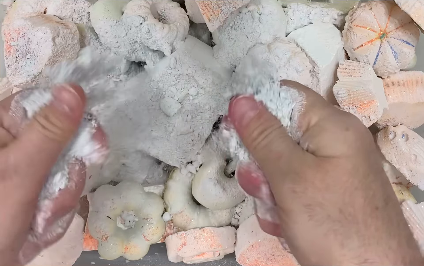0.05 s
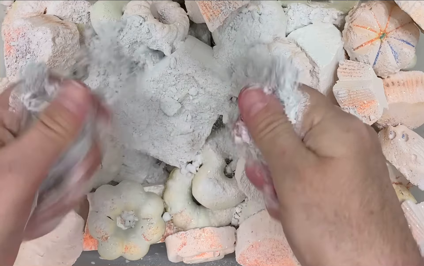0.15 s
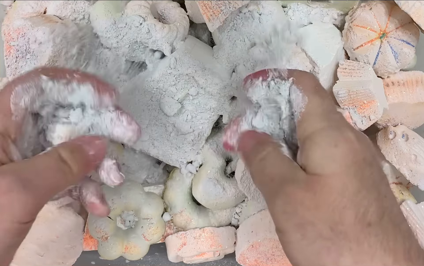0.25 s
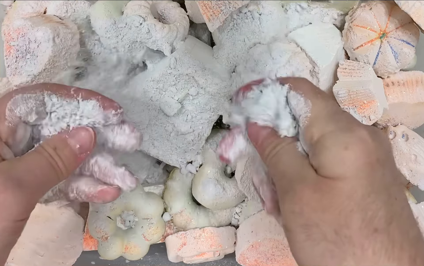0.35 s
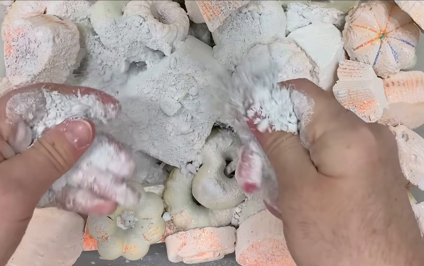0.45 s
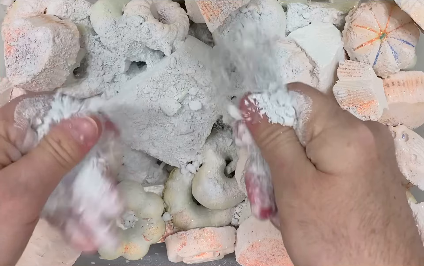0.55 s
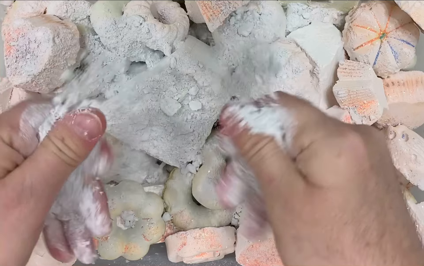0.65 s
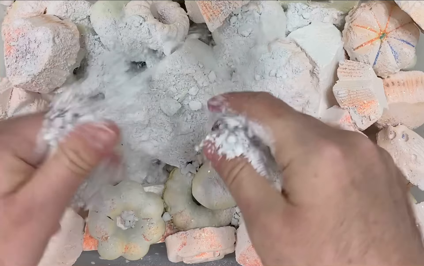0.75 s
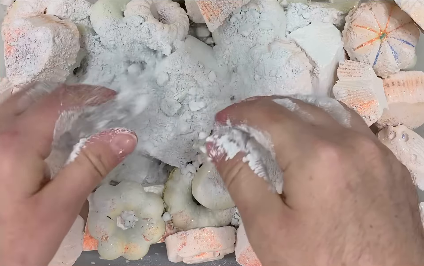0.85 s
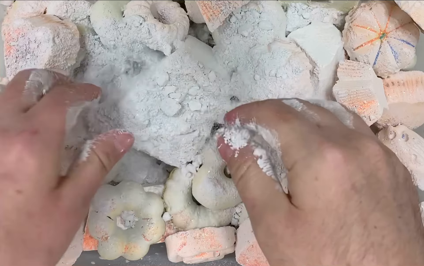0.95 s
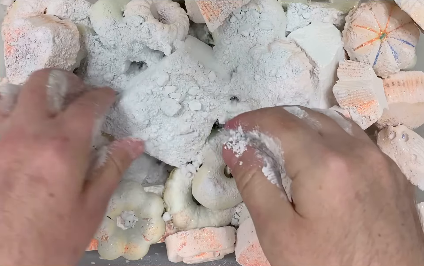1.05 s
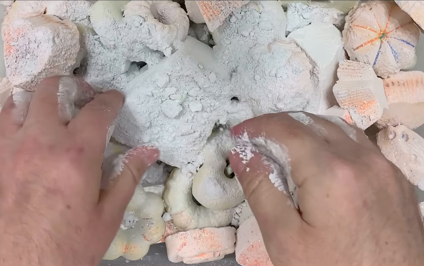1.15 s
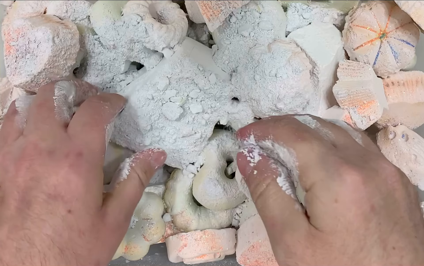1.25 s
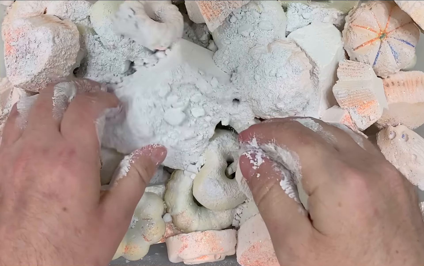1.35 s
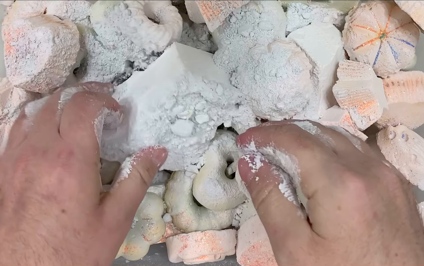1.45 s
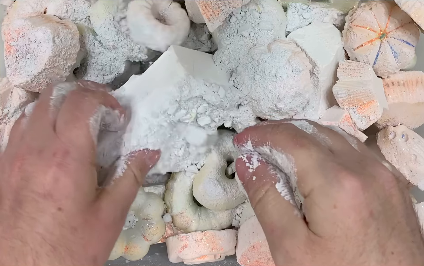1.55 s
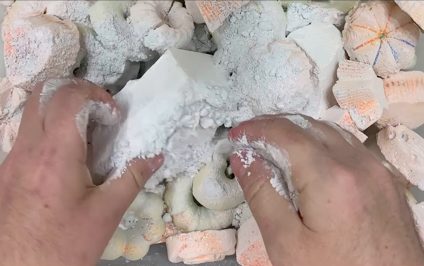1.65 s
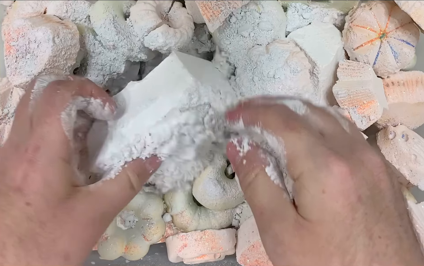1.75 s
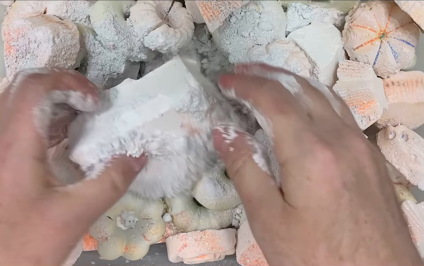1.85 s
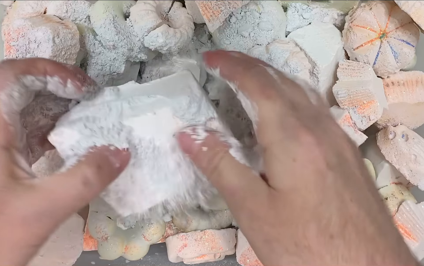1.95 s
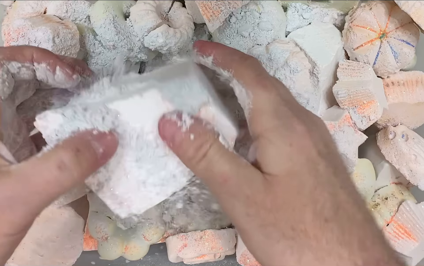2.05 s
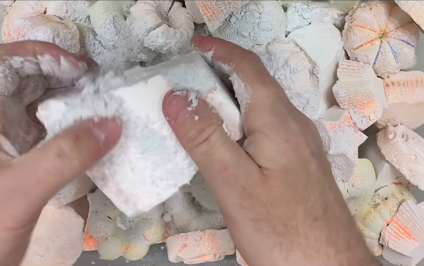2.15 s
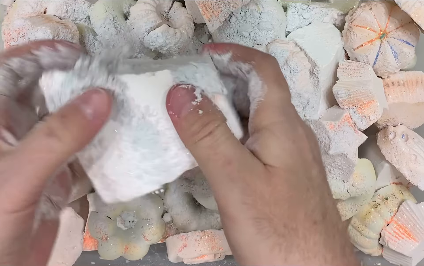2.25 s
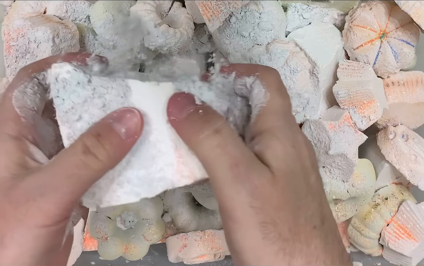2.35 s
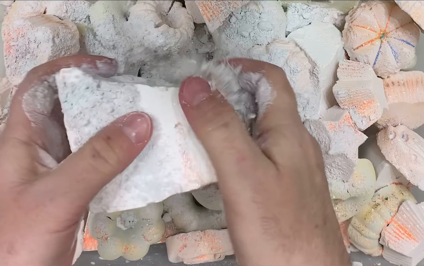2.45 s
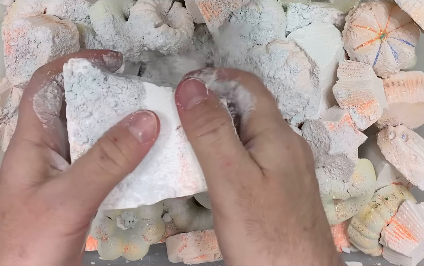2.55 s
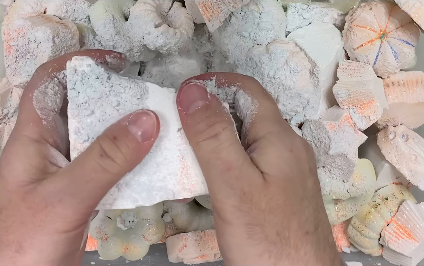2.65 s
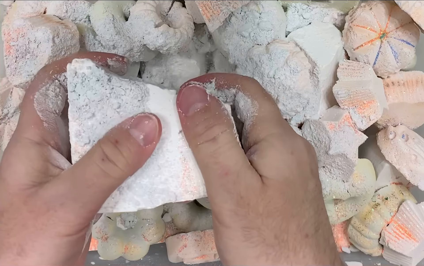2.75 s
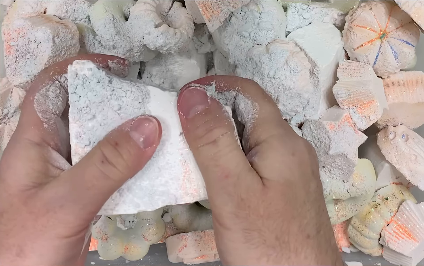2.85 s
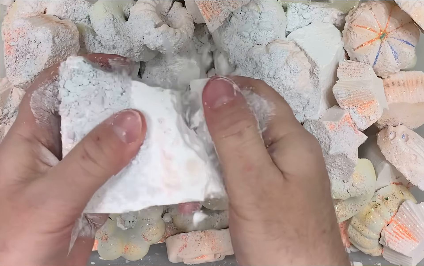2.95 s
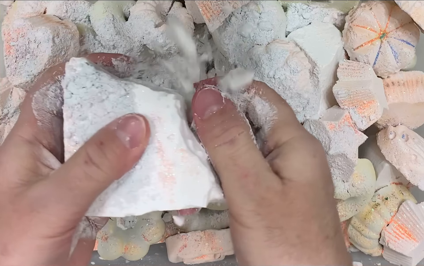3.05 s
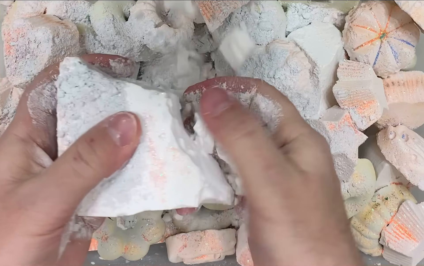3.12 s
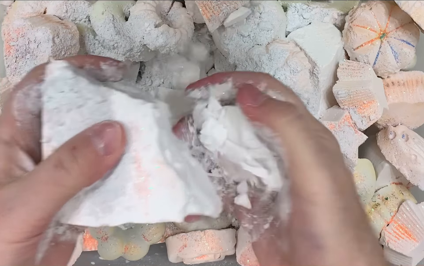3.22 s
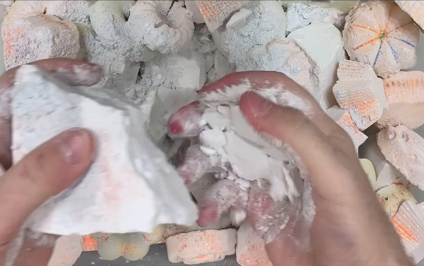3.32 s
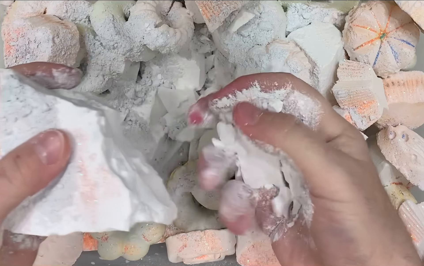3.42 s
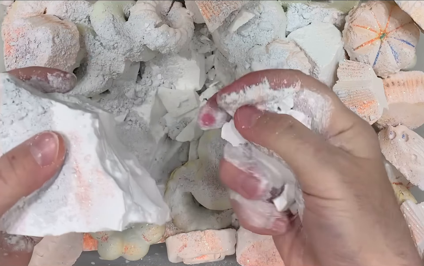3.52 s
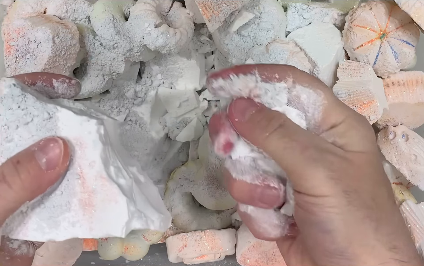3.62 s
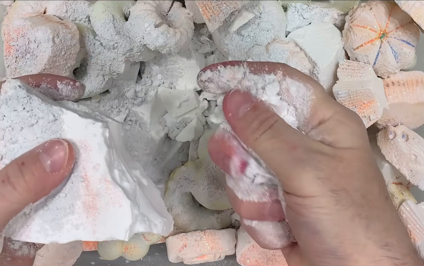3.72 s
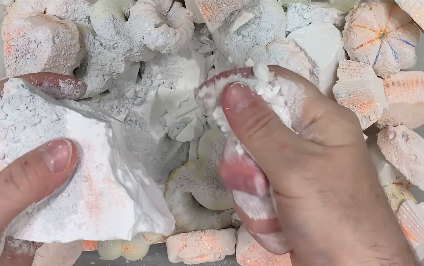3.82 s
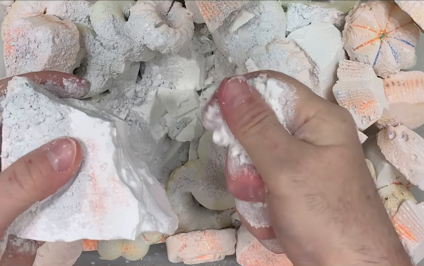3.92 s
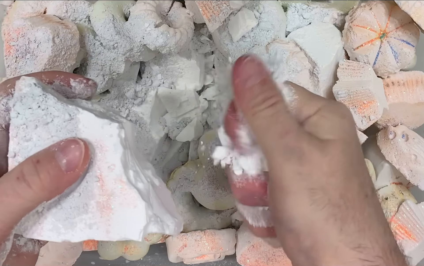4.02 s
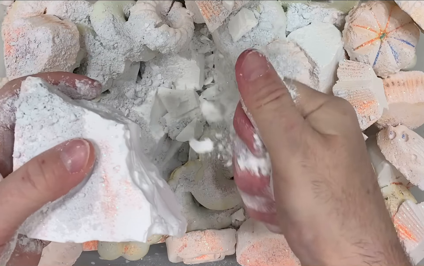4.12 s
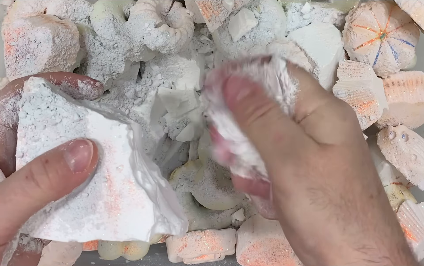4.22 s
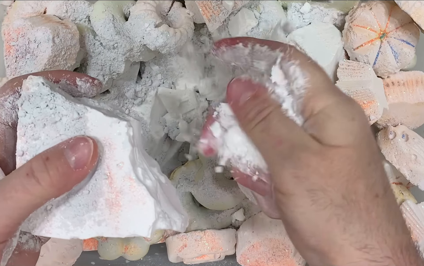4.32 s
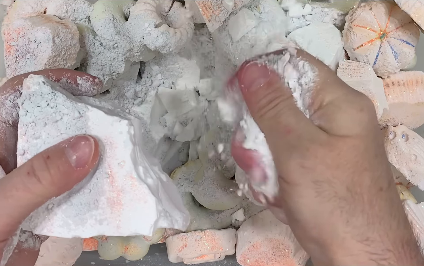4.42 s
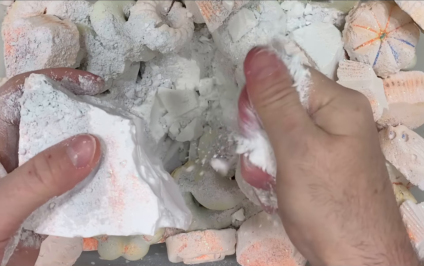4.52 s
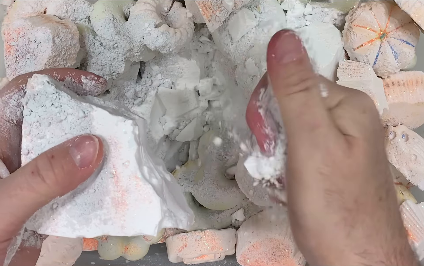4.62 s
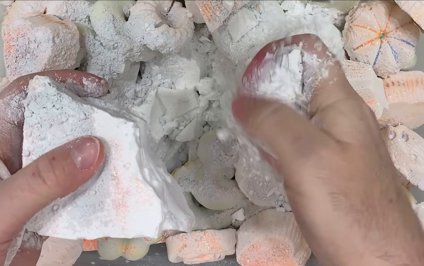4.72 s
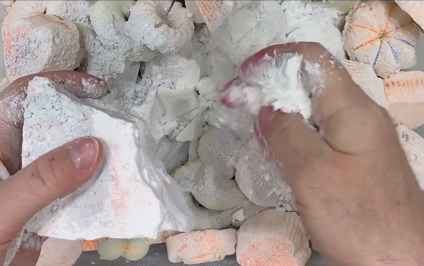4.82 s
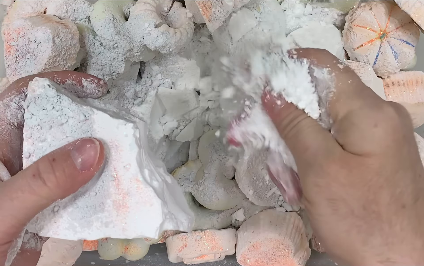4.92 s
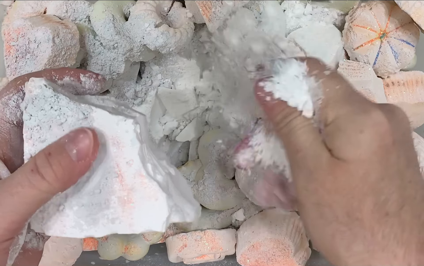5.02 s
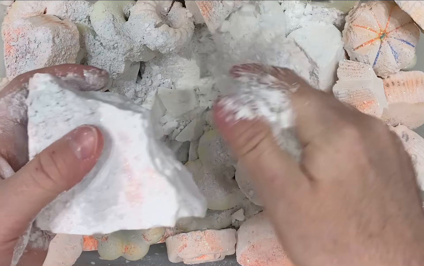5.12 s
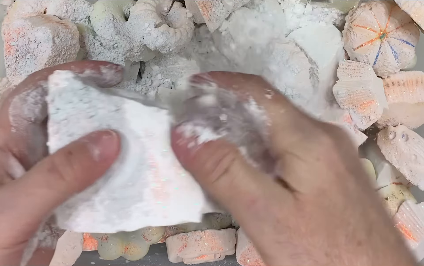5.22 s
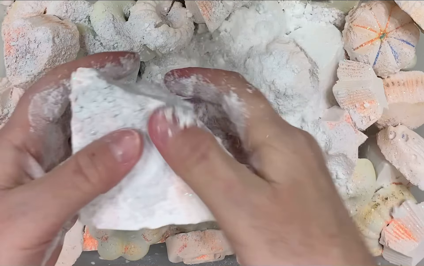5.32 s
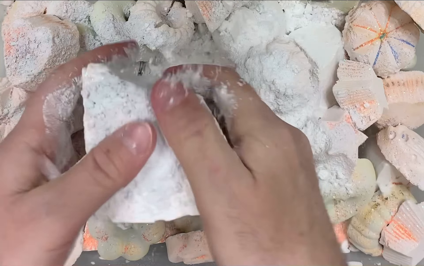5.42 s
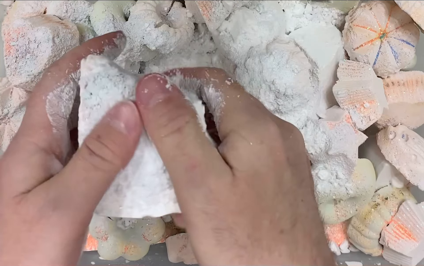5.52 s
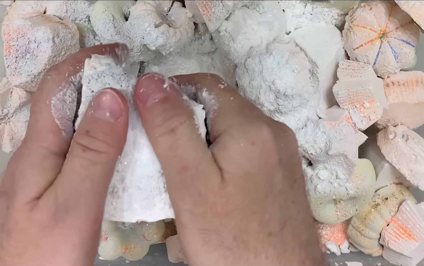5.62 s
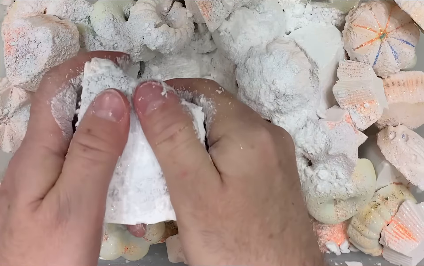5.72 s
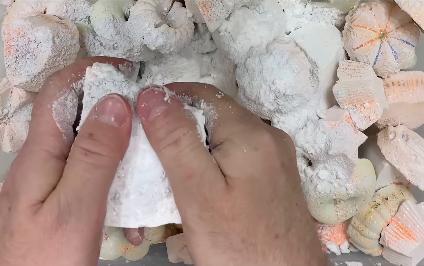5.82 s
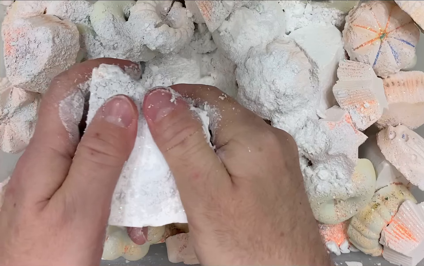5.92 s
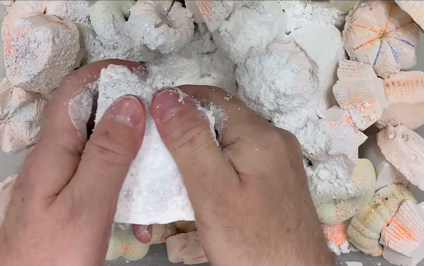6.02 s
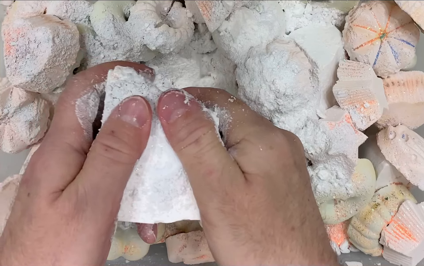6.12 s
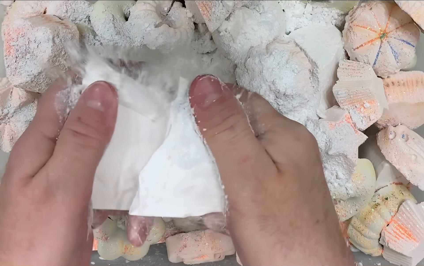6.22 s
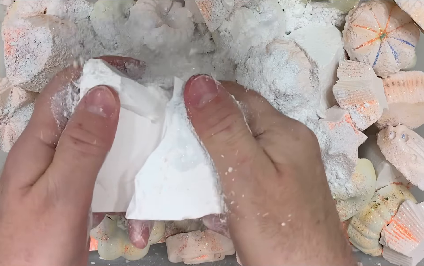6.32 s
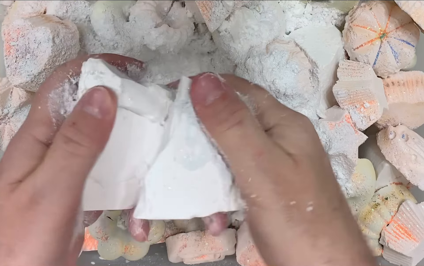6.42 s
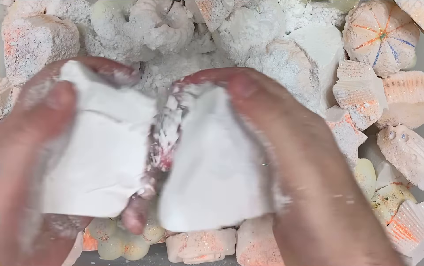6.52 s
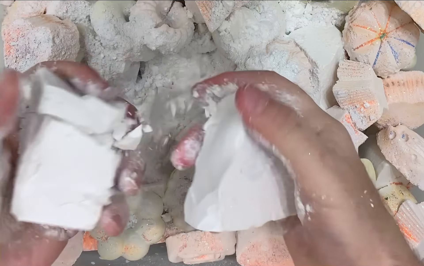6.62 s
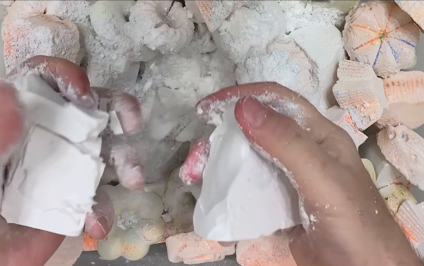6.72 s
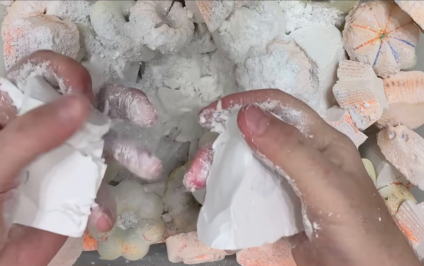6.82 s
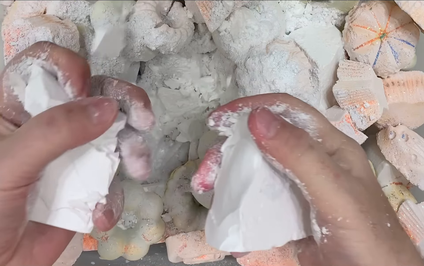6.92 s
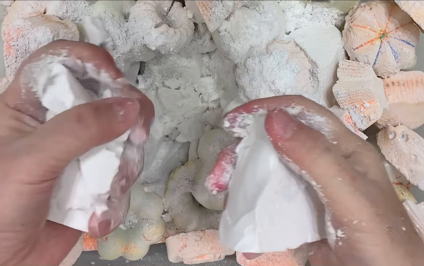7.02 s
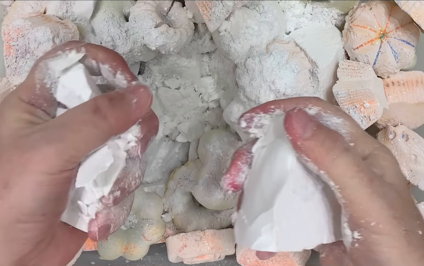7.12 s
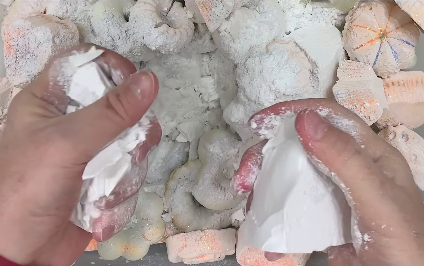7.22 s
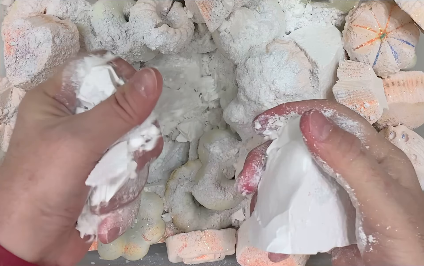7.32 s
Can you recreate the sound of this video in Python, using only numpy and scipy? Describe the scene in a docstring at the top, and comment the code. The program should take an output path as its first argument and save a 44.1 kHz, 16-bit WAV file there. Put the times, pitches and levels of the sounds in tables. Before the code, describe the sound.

Dry chalk blocks squeezed, snapped and crumbled by hand up close, gritty crunching with sharp cracks, falling crumbs and dull knocks in a quiet room.

```python
"""Chalk crumbled by hand, close up

A quiet room, with a small microphone close to two hands that squeeze, snap and crumble dry chalk. Swarms of
tiny ringing fractures make the grit; single cracks ring their pieces and spit noisy splinters. Lumps knock and
roll on the heap, and one big block tears apart in a run of tears that rings its modes. A low rumble of resonant
noise and a faint hiss lie beneath; the loudest breaks overload the input."""
import sys
import numpy as np
from scipy import signal
from scipy.fft import rfft, irfft, next_fast_len
from scipy.io import wavfile

SR = 44100
rng = np.random.default_rng(int(sys.argv[2]) if len(sys.argv) > 2 else 0)


def bounce(signal):
    """Save signal as a 16-bit WAV file at the path given by the first command-line argument."""
    frames = np.transpose(np.atleast_2d(signal))
    limited = np.clip(frames, -1, 1)
    pcm = np.round(limited * 32767).astype(np.int16)
    wavfile.write(sys.argv[1], SR, pcm)


def invert_db(level):
    """Linear amplitude ratio for a level in decibels (20 dB per decade), elementwise."""
    return 10 ** (np.asarray(level, dtype=float) / 20)


N = 325017

# room rumble, noise in the low resonances, before drift and thrum: (frequency [Hz], width [Hz], rms level [dB])
RUMBLE = [(62.3, 5.4, -37), (77.2, 7.6, -41), (125.3, 3.7, -41)]
# slow drift of the rumble: (time [s], level [dB])
RUMBLE_DRIFT = [(0, -4), (.8, 0.5), (1.65, 7), (1.9, -0.5), (7.37, -1.5)]
# colour of the faint hiss: (frequency [Hz], relative level [dB])
HISS_COLOUR = [(300, -2.5), (1500, -7.5), (15000, -7.5)]
# colour of the sound from the sides and of the echoes: (frequency [Hz], relative level [dB])
SIDE_COLOUR = [(100, -27), (300, 6.5), (2000, 7.5), (5000, -20), (15000, -60)]
# dull knocks of a block on the heap: (time [s], nominal level [dB], pitch [Hz])
KNOCKS = [(1.438, -6.5, 282), (1.465, -9, 126), (1.594, -11, 274), (1.63, -8.5, 298), (1.67, -11, 66.6),
          (2.93, -8, 237), (3.174, -1, 299), (3.19, -1.5, 331), (3.506, -9.5, 303), (4.244, -7.5, 488),
          (6.18, 0, 124), (6.983, -3, 263), (7.064, -6, 265)]
# modes of the big block: (frequency [Hz], relative level [dB], t60 [s])
BLOCK_MODES = [(253, -5, 0.047), (700, -9, .015), (1257, 3, 0.014), (2340, -0.5, 0.0078)]
# single cracks: (time [s], nominal level [dB], pitch of the piece [Hz], relative splinter level [dB])
CRACKS = [(0.031, -5.5, 2600, -12), (0.276, -15, 6700, 6.5), (0.379, -2, 1450, -10), (0.398, -0.5, 1490, 2),
          (0.408, 7.5, 3770, -19), (0.434, -1, 1400, -12), (0.452, -2, 1340, -20), (0.474, -9, 1510, -22),
          (0.522, -6, 1720, -12), (0.551, 0, 6000, -0.5), (0.567, -1, 6160, -19), (0.628, -10.5, 1490, -18),
          (0.826, -5, 4050, -25), (0.871, -4.5, 2900, -22), (0.932, 5, 3320, -5.5), (1.299, -4.5, 775, -34),
          (1.535, -21, 800, -10), (1.807, -14.5, 6140, -17), (1.967, -7.5, 940, -8),
          (2.008, -13, 1810, -23), (2.087, -10, 1840, -23), (2.111, -8.5, 930, -18),
          (2.173, -9.5, 760, -25), (2.292, -14, 6660, -8), (2.386, -16, 2870, -4), (2.517, -10, 1610, -23),
          (2.891, -13, 1500, -6), (3.041, 2, 2600, -27), (3.13, -5.5, 1290, -7.5), (3.172, -1, 480, -1.5),
          (3.217, -7, 1300, -5), (3.253, 2, 6160, -2), (3.354, -12, 826, -17), (3.401, -4.5, 1320, -20),
          (3.444, 0, 6300, -3), (3.472, -3.5, 1530, 6.5), (3.494, -2, 2150, 8), (3.632, 7, 2100, -7),
          (3.73, 6, 1470, 0), (3.802, -2, 1510, -10), (3.855, 4.5, 1390, 2), (3.913, -1, 6440, -6),
          (3.966, -4, 6070, 6.5), (4.0, -1.5, 1820, 1), (4.092, -3, 6500, -2.5), (4.237, -2, 916, -12),
          (4.286, -9.5, 1350, -14), (4.347, -8, 1830, -5), (4.379, -6.5, 1780, -14), (4.411, -9, 3270, -11),
          (5.079, -4, 1530, -3), (5.157, -10.5, 1490, -12), (5.2, -5.5, 1410, -2), (5.227, -12, 1400, -27),
          (5.287, -3, 848, -30), (5.338, -10.5, 674, -14), (5.352, -7.5, 525, -22), (5.455, -6.5, 920, -14),
          (5.492, -8, 3820, -14), (5.727, -10, 1410, -17), (6.294, -15, 1740, -6), (6.308, -8, 2400, 5),
          (6.382, -5, 1090, -12), (6.455, -14, 1680, -10), (6.597, -7, 6600, 0), (6.654, -10, 3700, -8),
          (6.692, -12, 6260, -4), (6.721, -3, 6060, 5), (6.815, -7, 780, 2), (6.87, 2.5, 5920, 1.5),
          (6.942, 10, 2720, -6), (6.988, 3, 1800, 5), (7.022, 1, 3040, -2), (7.066, 3, 904, -5),
          (7.125, 3, 3260, -20), (7.242, 9.5, 493, -8), (7.303, -3, 1700, -4), (7.344, 14.5, 6430, -17)]
# squeezes, rubs and breaks that shed grit:
# (start [s], length [s], coarse grit level [dB], powder level [dB], lump level [dB])
SQUEEZES = [(-0.02, .17, -18, -25, -26.5), (0.265, 0.12, -48, -24, -30), (0.335, 0.28, -20.5, -27.5, -29),
            (0.539, 0.079, -22.5, -19, -43), (0.659, 0.12, -30, -24, -39), (0.81, 0.21, -32, -25.5, -25.5),
            (0.904, 0.16, -30, -37, -25.5), (1.11, 0.18, -35.5, -41, -30.5), (1.27, 0.17, -39, -70, -23.5),
            (1.437, 0.22, -68, -61, -27), (1.55, 0.12, -54, -35, -21), (1.852, 0.24, -36, -39.5, -34.5),
            (1.941, 0.18, -29.5, -44, -26), (2.051, 0.15, -30.5, -31.5, -23),
            (2.272, 0.18, -31.5, -22, -35.5), (2.495, 0.18, -35.5, -37.5, -39.5),
            (2.893, 0.15, -11.5, -8, -24.5), (3.162, 0.19, -25, -25, -16.5),
            (3.389, 0.083, -24, -47, -20.5), (3.419, 0.098, -27, -21, -29), (3.48, 0.091, -13, -9, -16),
            (3.566, 0.25, -24, -15, -31.5), (3.709, 0.15, -13, -12, -27), (3.839, 0.098, -16, -16, -25),
            (3.902, 0.096, -26, -11.5, -28), (3.974, 0.11, -23, -15.5, -27.5),
            (4.21, 0.14, -25, -20, -25.5), (4.37, 0.24, -28.5, -26, -32.5), (4.721, 0.062, -30, -32, -34),
            (4.827, 0.16, -26.5, -27.5, -37.5), (5.053, 0.27, -26, -27.5, -27.5),
            (5.295, 0.26, -25.5, -33, -25.5), (5.442, 0.14, -29, -23.5, -29),
            (5.697, 0.081, -28, -71, -30.5), (6.157, 0.18, -11.5, -9.5, -13.5),
            (6.588, 0.21, -41, -23.5, -36.5), (6.81, 0.2, -26.5, -20.5, -26),
            (6.929, 0.22, -17, -14, -21.5), (7.014, 0.14, -11.5, -9, -23), (7.116, 0.086, -15.5, -12, -31),
            (7.171, 0.18, -17, -10.5, -22), (7.327, .1, -25.5, -13, -24)]
# crumbs falling between squeezes: (time [s], powder level [dB])
TRICKLE = [(0, -28.5), (.9, -40), (1.3, -46), (2.8, -45.5), (3.5, -35), (4.6, -36), (5.5, -36), (5.8, -69),
           (6.15, -54), (6.45, -34.5), (7.37, -35.5)]
# colour of each grain size, lumps down to powder: (frequency [Hz], relative level [dB])
LUMP_COLOUR = [(130, -74), (220, 6), (350, -8), (550, -6), (800, -3)]
COARSE_COLOUR = [(700, -8.5), (1300, 4), (2300, 7)]
FINE_COLOUR = [(2400, -18), (3300, -5), (4700, -5)]
POWDER_COLOUR = [(5000, 3.5), (6500, 0.5), (9000, -8), (12000, -1.5), (16000, -43)]


def rms_one(x):
    """Scales a signal to an rms of 1."""
    return x / np.sqrt(np.mean(x ** 2) + 1e-20)


def at_hz(points, hz):
    """Reads a (frequency [Hz], level [dB]) table along log frequency."""
    table_hz, level_db = np.transpose(points)
    return np.interp(np.log(hz + 1), np.log(table_hz), level_db)


def in_time(rows):
    """Draws each column of a (time [s], level [dB]) table as a line over the whole scene."""
    s, *columns = np.transpose(rows)
    return [np.interp(np.arange(N) / SR, s, column) for column in columns]


def coloured(x, points):
    """Shapes the spectrum along a (frequency [Hz], level [dB]) table."""
    size = next_fast_len(x.shape[-1])
    gain = invert_db(at_hz(points, np.fft.rfftfreq(size, 1 / SR)))
    return irfft(rfft(x, size) * gain, size)[..., :x.shape[-1]]


def ring(clicks, hz, t60):
    """A two-pole resonance: a unit click sets a sine of about height 1 ringing and dying."""
    r = invert_db(-60 / (t60 * SR))
    w = 2 * np.pi * hz / SR
    return signal.lfilter([0, np.sin(w)], [1, -2 * r * np.cos(w), r * r], clicks + 1e-18)


def air_hiss():
    """Faint coloured noise, one row for the centre and one for the sides."""
    return invert_db(-41) * rms_one(coloured(rng.standard_normal((2, N)), HISS_COLOUR))


def room_tone():
    """Noise in narrow low resonances makes a wavering rumble, nearly alike in both channels."""
    out = 0
    for hz, width_hz, level_db in RUMBLE:
        t60 = np.log(1000) / (np.pi * width_hz)
        noise = rng.standard_normal((2, N + SR))
        mid, side = ring(noise, hz, t60)[:, SR:]  # the first second lets the resonance build up
        out = out + invert_db(level_db) * rms_one(mid + invert_db(-13.5) * side * [[1], [-1]])
    return out


def thrum(lump_db):
    """The table thrums with the lumps: a gain on the rumble that follows their level with a lag."""
    lag_s = 0.027
    keep = np.exp(-1 / (lag_s * SR))
    return 1 + signal.lfilter([1 - keep], [1, -keep], invert_db(lump_db + 24))


def reflections(x):
    """Dense decaying echoes off heap and walls, different in each channel; they change as the hands move."""
    room_t60_s, first_echo_s = 0.064, 0.0015
    hop = 4096
    t = np.arange(hop) / SR
    window = np.sin(np.pi * np.arange(2 * hop) / (2 * hop))
    padded = np.pad(x, (hop, 2 * hop))
    out = np.zeros((2, N + 5 * hop))
    for at in range(0, N + hop, hop):
        tail = rng.standard_normal((2, hop)) * invert_db(-60 * t / room_t60_s) * (t > first_echo_s)
        tail = coloured(tail / np.sqrt(np.sum(tail ** 2, axis=1, keepdims=True)), SIDE_COLOUR)
        piece = padded[at:at + 2 * hop] * window
        out[:, at:at + 3 * hop - 1] += signal.fftconvolve(piece[None], tail, axes=1)
    return out[:, hop:hop + N]


def two_channels(centre, sides):
    """Side sound has opposite sign in the two channels; the right channel is a little late, its phase turned."""
    lag_s, lead_rad, lead_hz = 0.00025, 4.527, 2670  # the phase lead levels off above lead_hz
    size = next_fast_len(N + 64)
    hz = np.fft.rfftfreq(size, 1 / SR)
    turn = lead_rad * np.tanh(hz / lead_hz) - 2 * np.pi * hz * lag_s
    sides = coloured(sides, SIDE_COLOUR)
    left = invert_db(-0.5) * (centre + sides)
    right = irfft(rfft(centre - sides, size) * np.exp(1j * turn), size)[:N]
    return np.array([left, right])


def knocks():
    """A soft contact swells within milliseconds and rings the block and, lower, the heap."""
    out = np.zeros(N + 4096)
    t = np.arange(4096) / SR
    swell = 1 - np.exp(-t / 0.0026)
    for s, level_db, hz in KNOCKS:
        pitches = hz * np.array([[1], [0.56], [1.7]])
        decay = invert_db(-60 * t / (0.03 + 16 / pitches))
        body = invert_db([[-1], [-7], [-9]]) * np.sin(2 * np.pi * pitches * t) * decay
        at = round(s * SR)
        out[at:at + 4096] += invert_db(level_db) * body.sum(axis=0) * swell
    return out[:N]


def block_break():
    """The big block tears apart: a dying run of random tears rings its modes."""
    start_s, rise_s, t60_s, level_db, tears_per_s = 6.162, 0.016, 0.42, -5, 1500
    t = np.arange(N) / SR - start_s
    shape = (len(BLOCK_MODES), N)
    tears = (rng.random(shape) < tears_per_s / SR) * rng.standard_normal(shape)
    rings = 0
    for row, (hz, mode_db, mode_t60) in zip(tears, BLOCK_MODES):
        rings = rings + invert_db(mode_db) * rms_one(ring(row, hz, mode_t60))
    decay = invert_db(level_db - 60 * np.maximum(t, 0) / t60_s)
    return decay * np.clip(t / rise_s, 0, 1) * rings


def cracks():
    """Each crack rings its piece briefly at three rough pitches and spits a burst of bright splinters."""
    out = np.zeros(N + 2048)
    t = np.arange(2048) / SR
    onset = 1 - np.exp(-t / 0.0003)
    chance = rng.random((len(CRACKS), 2))
    spit_band = signal.butter(2, [1300, 14000], "band", fs=SR, output="sos")
    spit = signal.sosfilt(spit_band, rng.standard_normal((len(CRACKS), 2048)))
    for (s, level_db, hz, splinter_db), luck, splinters in zip(CRACKS, chance, spit):
        pitches = hz * np.array([1, 0.545 + 0.422 * luck[0], 2.1 + 0.29 * luck[1]])[:, None]
        decay = invert_db(-60 * t / (0.012 + 10.5 / pitches))
        body = invert_db([[-3], [-9], [-8]]) * np.sin(2 * np.pi * pitches * t) * decay
        burst = invert_db(splinter_db + 2.5) * splinters * invert_db(-60 * t / 0.018)
        at = round(s * SR)
        out[at:at + 2048] += invert_db(level_db) * (body.sum(axis=0) + burst) * onset
    return out[:N]


def aftermath():
    """Every crack sets off a swarm of its own: a gain that starts at once and dies away."""
    t60_s = 0.07
    starts = np.zeros(N)
    s, level_db = np.transpose(CRACKS)[:2]
    starts[np.round(s * SR).astype(int)] = invert_db(level_db - 24)
    return signal.lfilter([1], [1, -invert_db(-60 / (t60_s * SR))], starts)


def squeezes():
    """Levels [dB] of coarse grit, powder and lumps: squeezes of one envelope over the trickle of crumbs."""
    attack_s, slowing = 0.0075, 0.36  # softer bites slower: dB of attack time per dB of coarse grit below 0
    hold_share, fade_db = 0.35, 13  # holds for this share of its length, then loses fade_db over the rest
    trickle_db, = in_time(TRICKLE)
    over_powder_db = np.array([[-5.5], [0], [-7]])  # coarse grit, powder, lumps
    power = invert_db(trickle_db + over_powder_db) ** 2
    for s, length, *level_db in SQUEEZES:
        at = max(round(s * SR), 0)
        t = np.arange(at, min(N, at + SR)) / SR - s + 1 / SR
        bite = np.minimum(t / (attack_s * invert_db(-slowing * level_db[0])), 1)
        fade = np.maximum(t / length - hold_share, 0) / (1 - hold_share)
        squeeze = invert_db(np.array(level_db)[:, None] - fade_db * fade) * bite
        power[:, at:at + SR] += squeeze ** 2
    return 10 * np.log10(power)


def swarms(per_s, spread_db, fade_s):
    """Fractures come in swarms that start at once and die away; a gain of rms 1 over a calm base."""
    sizes = invert_db(spread_db * np.clip(rng.standard_normal(N), -2, 1))
    starts = (rng.random(N) < per_s / SR) * sizes
    return rms_one(0.82 + signal.lfilter([1], [1, -np.exp(-1 / (fade_s * SR))], starts))


def grains(colour, per_s, size_db, cycles, count, patchy_db):
    """Random clicks, few large and many small, each ring one of many grain pitches of changing share.
    Row one breaks at the centre, row two at the sides."""
    sizes = invert_db(size_db * np.minimum(rng.exponential(1, (2, N)), 5)) * rng.choice([-1, 1], (2, N))
    clicks = sizes * (rng.random((2, N)) < per_s / SR)
    dealt = rng.integers(0, count, N)  # which pitch a click gets
    steps = np.linspace(0, N, 120)
    out = 0
    for k, hz in enumerate(np.geomspace(colour[0][0], colour[-1][0], count)):
        wander = np.interp(np.arange(N), steps, rng.standard_normal(len(steps)))
        share = invert_db(at_hz(colour, hz) + patchy_db * wander)
        out = out + np.sqrt(hz) * ring(share * clicks * (dealt == k), hz, cycles / hz)
    high_pass = signal.butter(2, colour[0][0] * 0.61, "high", fs=SR, output="sos")
    return rms_one(signal.sosfilt(high_pass, out))


def crumbling(coarse_db, powder_over_db, lump_db):
    """Four grain sizes: each grit has swarms of its own, the powder also puffs, the lumps just roll.
    powder_over_db is relative to the coarse grit."""
    fine_over_db = 2.5 + 0.56 * powder_over_db  # fine grit follows the powder in part
    after = aftermath()
    big, middle, small = (invert_db(coarse_db) * swarms(per_s=90, spread_db=3.5, fade_s=0.0053) + after
                          for _ in range(3))
    puffs = invert_db(coarse_db) * swarms(per_s=39, spread_db=5.0, fade_s=0.096)
    coarse = grains(COARSE_COLOUR, per_s=1000, size_db=2.5, cycles=14.8, count=14, patchy_db=5.0)
    fine = grains(FINE_COLOUR, per_s=3000, size_db=1.5, cycles=29.0, count=10, patchy_db=3.5)
    powder = grains(POWDER_COLOUR, per_s=9000, size_db=0.5, cycles=20.0, count=14, patchy_db=6.5)
    lumps = grains(LUMP_COLOUR, per_s=900, size_db=1.5, cycles=16.3, count=16, patchy_db=4.0)
    grit = big * coarse + middle * invert_db(fine_over_db) * fine
    dust = invert_db(powder_over_db - 3.5) * (1.414 * small + 0.92 * puffs) * powder
    return grit + dust + invert_db(lump_db) * lumps


def scene():
    """Chalk in the two channels, its echoes in the room, and the rumble beneath."""
    coarse_db, powder_db, lump_db = squeezes()
    centre, sides = crumbling(coarse_db, powder_db - coarse_db, lump_db) + air_hiss()
    source = centre + cracks() + knocks() + block_break()
    direct = two_channels(source, invert_db(-7) * sides)
    echoes = invert_db(-5.5) * reflections(source)
    drift_db, = in_time(RUMBLE_DRIFT)
    rumble = invert_db(drift_db) * thrum(lump_db) * room_tone()
    return direct + echoes + rumble


def top_cut(x):
    """Nothing passes above the cut-off."""
    return signal.sosfilt(signal.butter(12, 16110, fs=SR, output="sos"), x)


def record(dry):
    """The microphone input overloads hard, flattening peaks just below full scale."""
    overloaded = np.clip(dry, -0.98, 0.98)
    return top_cut(overloaded)


dry = scene()
out = record(dry)
bounce(out)
```